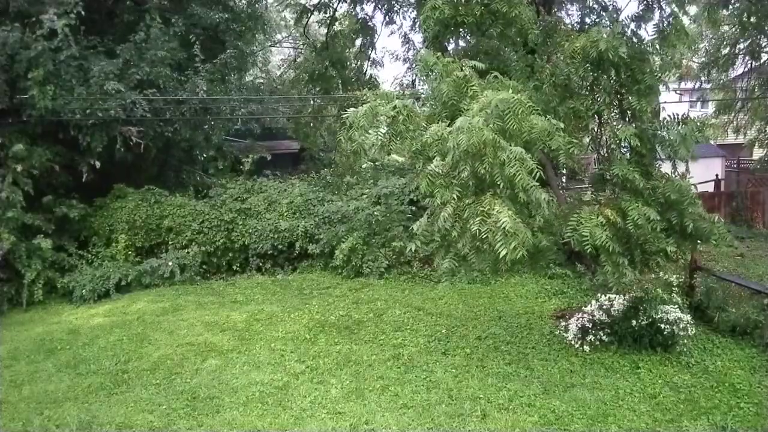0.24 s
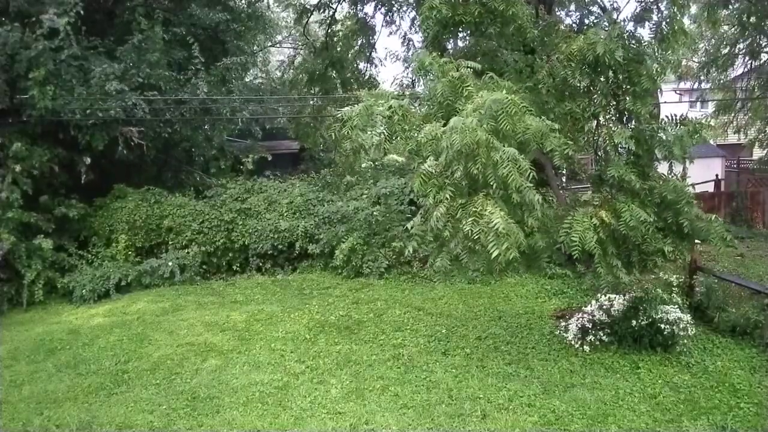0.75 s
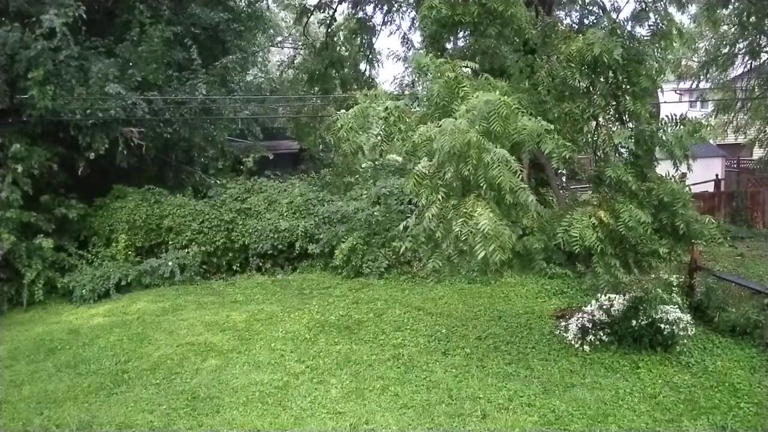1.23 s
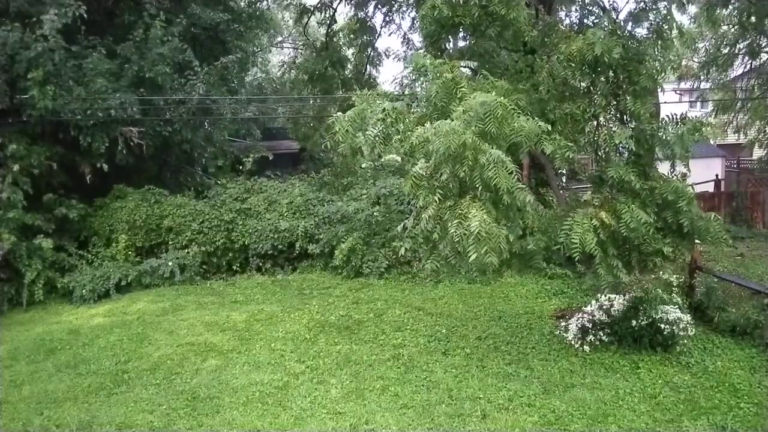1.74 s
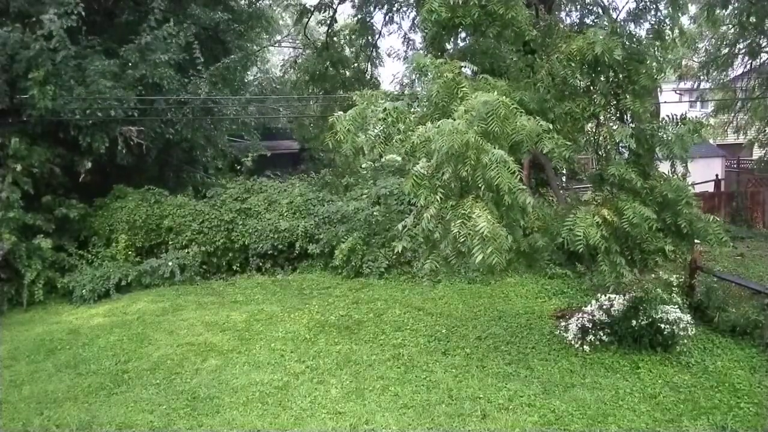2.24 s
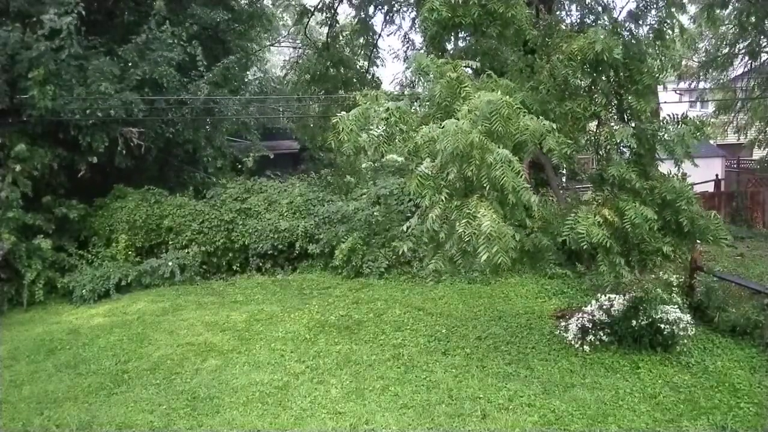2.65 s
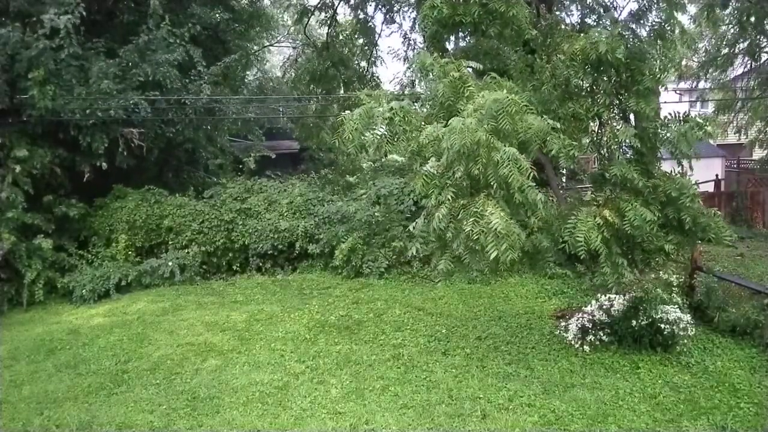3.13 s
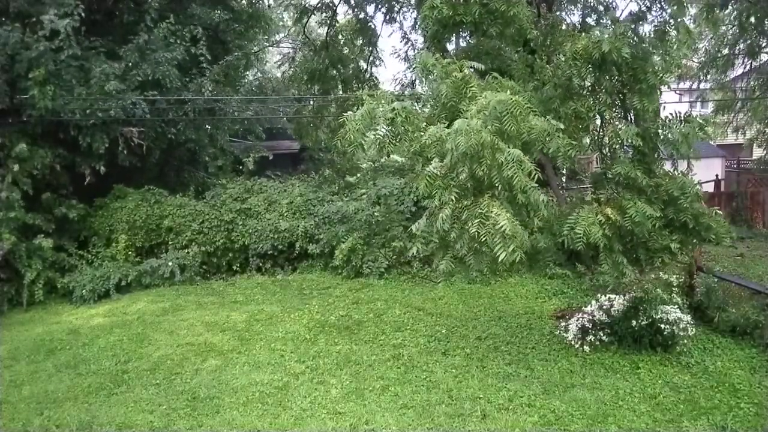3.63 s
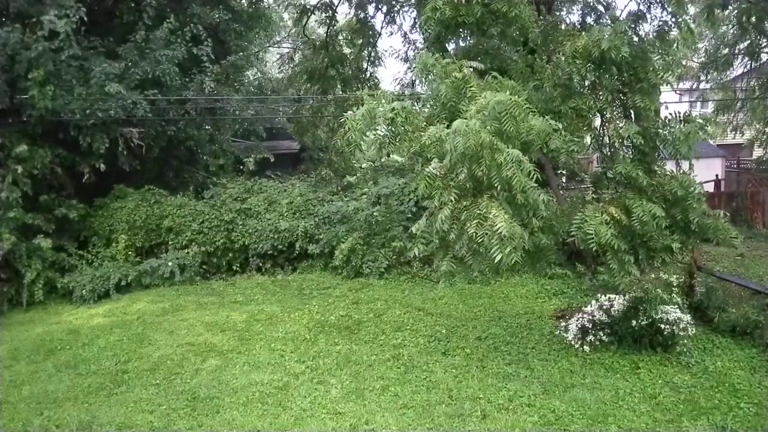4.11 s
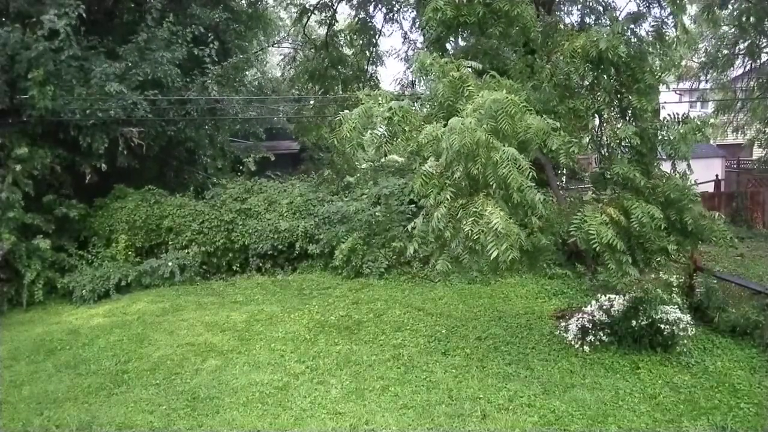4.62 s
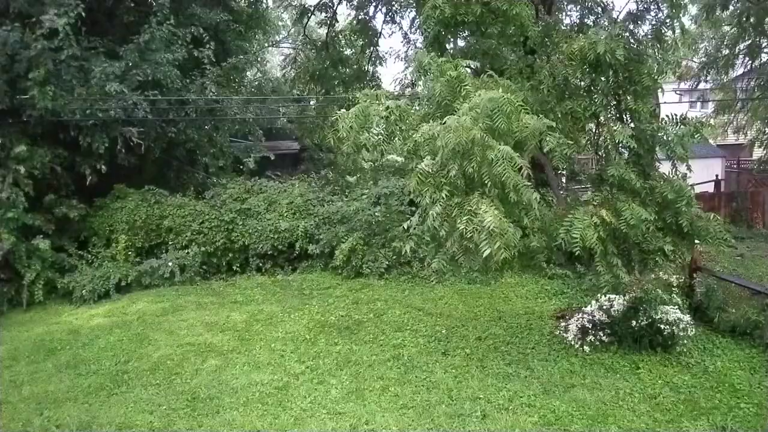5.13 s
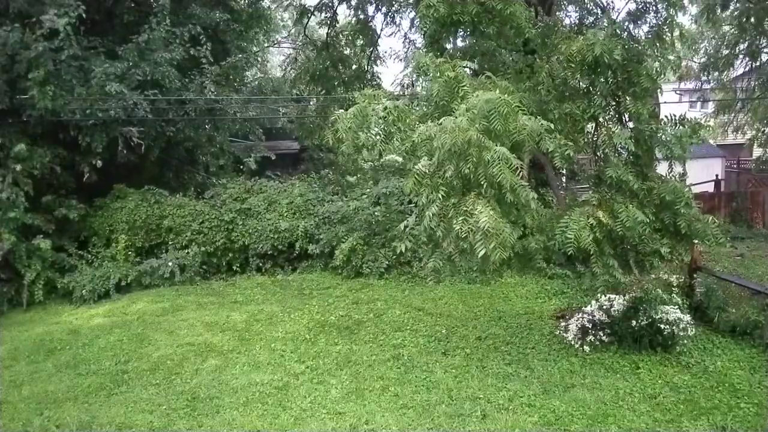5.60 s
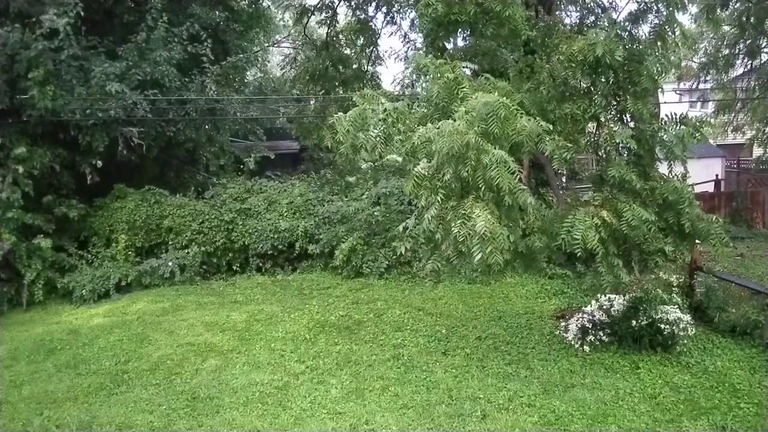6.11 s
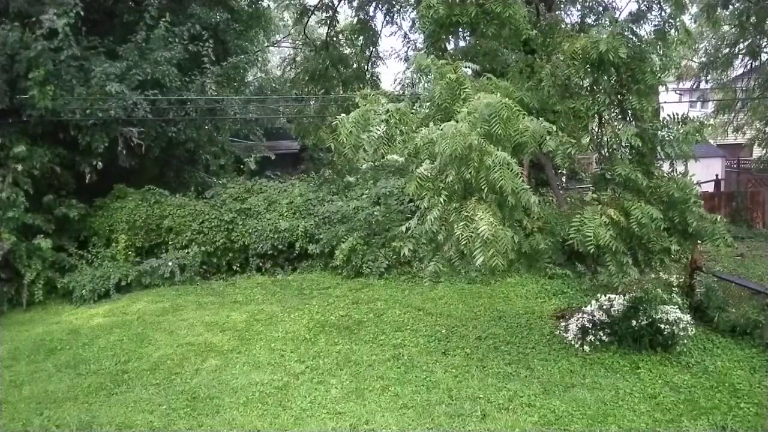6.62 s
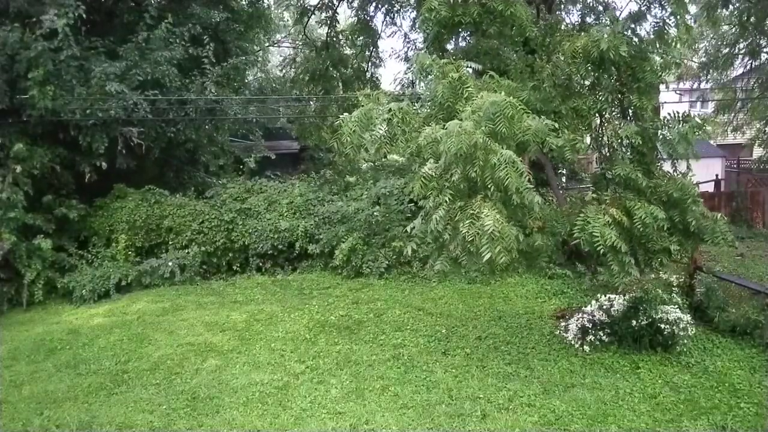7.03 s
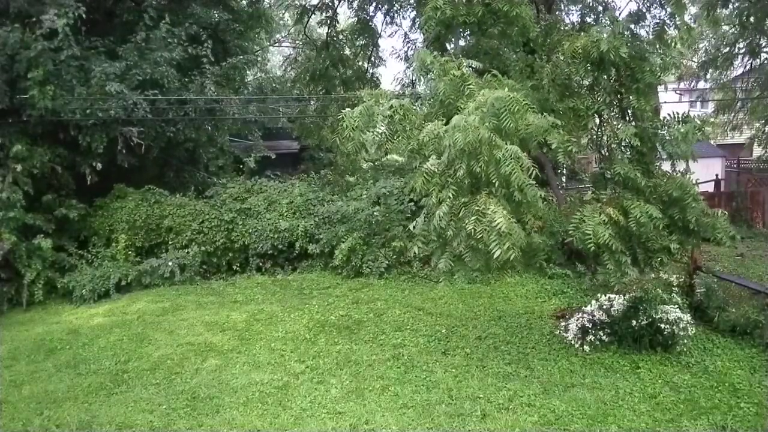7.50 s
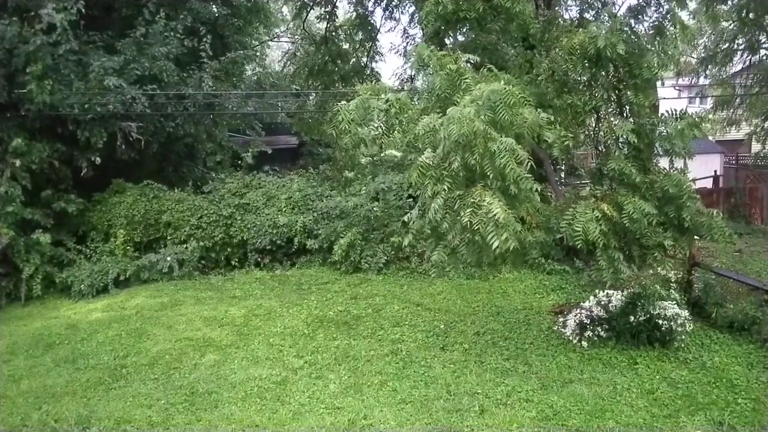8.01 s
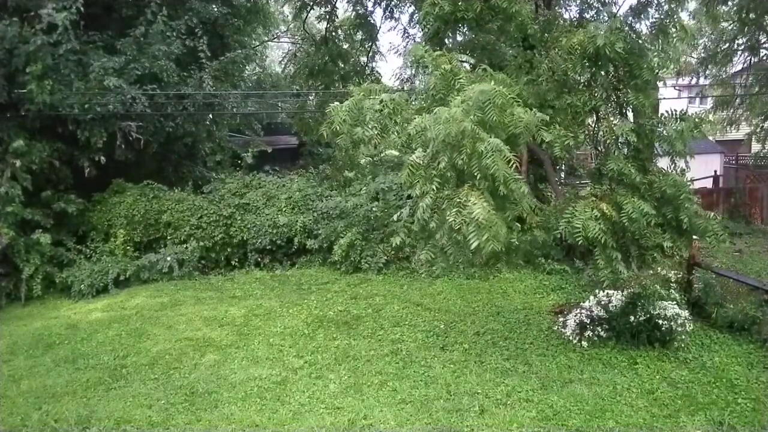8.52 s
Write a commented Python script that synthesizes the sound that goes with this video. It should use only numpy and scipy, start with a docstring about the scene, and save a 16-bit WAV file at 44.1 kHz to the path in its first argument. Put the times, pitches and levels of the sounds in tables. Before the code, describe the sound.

Steady rain on a garden, hollow taps and fine ticking on a nearby cover, low wind buffets growing into a long gust near the end.

```python
"""A back garden in heavy rain, with the microphone under a shelter.
Close by, drops knock on a hollow cover: ringing modes, with small ticks that swell in flurries.
A few near drops splash brightly, as short bursts of filtered noise.
Farther off, countless drops on leaves and lawn merge into a hiss of shaped noise and random clicks.
A breeze rumbles on the microphone in short buffets and rises to a long gust near the end."""
import sys
import numpy as np
from scipy import signal
from scipy.fft import rfft, irfft, next_fast_len
from scipy.io import wavfile
from scipy.ndimage import uniform_filter1d

SR = 44100
rng = np.random.default_rng(int(sys.argv[2]) if len(sys.argv) > 2 else 0)


def generate_wav(sig):
    """Save sig (samples, or channels by samples) to the path in sys.argv[1] as 16-bit PCM at SR."""
    pcm = np.round(np.clip(np.atleast_2d(sig).T, -1, 1) * 32767).astype(np.int16)
    wavfile.write(sys.argv[1], SR, pcm)


N = 385875

# big drops on the cover: t/s, relative peak level/dB, middle ring level/dB, upper ring level/dB
BIG_DROPS = [(0.015, -17, -23, -21), (0.035, -15.5, -12, -17), (0.085, -23, 2, -2), (0.209, -21, 1, -24),
             (0.275, -17, -22, -9.5), (0.468, -19.5, -19, -17), (0.51, -25, -1, -23), (0.535, -22, -7, -27),
             (0.737, -16, -16, -25), (1.204, -18.5, -8, -30), (1.324, -21, -18, -13),
             (1.333, -18.5, -19, -9), (1.41, -21, -14, -13), (1.474, -22, -10, -12), (1.485, -16, -18, -23),
             (1.516, -22, -15, -13), (1.542, -21, -10, -16), (1.572, -13, -19, -32),
             (1.635, -13.5, -10, -24), (1.796, -17.5, -23, -17), (1.893, -23.5, -9, -12),
             (1.981, -26, -14, 0), (2.003, -15.5, 1, -2.5), (2.019, -24, -10, -9), (2.035, -21, -10, -16),
             (2.113, -21.5, -13, -17), (2.333, -21, -12, -15), (2.596, -25, -12, -7),
             (2.841, -17, -23, -32), (2.897, -15.5, -12, -18), (2.959, -22.5, -12, -13),
             (3.091, -21, -11, -28), (3.149, -13, -23, -23), (3.232, -23, -10, -11),
             (3.433, -19.5, -10, -30), (3.48, -16.5, -26, -32), (3.518, -16, -13, -21),
             (3.559, -22.5, -12, -16), (3.829, -21, -22, -26), (3.856, -14.5, -16, -27),
             (3.903, -22, -11, -15), (3.952, -19, -5, -14), (4.037, -24, -13, -15), (4.112, -22, -12, -21),
             (4.137, -20, -10, -18), (4.28, -23, 3, -6), (4.312, -22.5, -1, -3), (4.338, -24, -15, -21),
             (4.386, -25, -13, -12), (4.467, -23, -6, -14), (4.494, -20.5, -15, -8.5),
             (4.715, -21, -13, -21), (4.749, -23, -6, -8), (4.764, -18.5, -10, -5), (4.801, -23, -15, -12),
             (4.818, -14, -14, -15), (4.903, -22, -15, -3), (4.937, -19, -18, -22), (4.961, -26, -8, -14),
             (4.991, -16, -12, -19), (5.019, -24, -19, -19), (5.074, -20, -5, -12), (5.161, -27, -14, -9),
             (5.276, -28, -11, -5), (5.298, -25.5, -12, -7), (5.356, -20.5, -4, -13), (5.471, -28, -6, -9),
             (6.11, -19.5, -20, -16), (6.158, -16, -12, -15), (6.206, -15, -10, -17),
             (6.317, -22.5, -18, -11), (6.333, -19.5, -16, -14), (6.414, -21, 3, -14),
             (6.459, -18.5, -9, -11), (6.473, -14, -10, -22), (6.573, -13.5, -10, -14),
             (6.591, -11.5, -9, -15), (6.605, -20, -15, -17), (6.772, -19, -4, -11),
             (6.828, -12.5, -13, -23), (6.881, -15, -21, -19), (6.965, -13.5, -25, -20),
             (7.017, -16, -18, -29), (7.046, -19, -5, -10), (7.085, -15, -2, -4), (7.116, -21, -11, -13),
             (7.183, -19, -13, -11), (7.289, -15, -9, -17), (7.367, -14, -13, -13), (7.386, -17, -8, -14),
             (7.396, -14.5, -9, -15), (7.41, -12.5, -10, -21), (7.455, -18.5, -10, -14),
             (7.494, -11.5, -20, -25), (7.546, -18, -13, -16), (7.577, -16, -7, -13),
             (7.587, -17, -15, -13), (7.621, -28, -15, 2), (7.74, -11.5, -21, -18),
             (7.845, -19.5, -14, -16), (8.041, -19, -7, -10), (8.059, -14, -10, -14), (8.124, -20, -5, -6),
             (8.295, -15.5, -11, -15), (8.343, -20, -8, -7), (8.385, -17.5, -12, -15),
             (8.418, -18.5, -5, -9), (8.447, -17.5, -11, -31), (8.589, -12, -13, -34), (8.646, -23, 4, -19),
             (8.719, -15, -18, -15)]
# modes of the cover: f/Hz, relative level/dB, t60/s, share of the middle ring, share of the upper ring,
# lag of the right side behind the left/rad
COVER_MODES = [(730, -3, 0.016, 0, 0, 0), (920, 5, 0.034, 0.1, 0.079, 0.37),
               (1062, -4.5, 0.033, 0.96, 0.0072, 0.49), (1357.5, -3.5, 0.054, 0, 1, 0.54),
               (1480, -67, 0.012, 0.49, 0.51, -13.5), (2260, -17, 0.025, 0.083, 1, 1.4),
               (2785, -17, 0.0079, 0.089, 0.3, 2.4), (4870, -20.5, 0.019, 0, 0.011, 1)]
# flurries of small drops on the cover: t/s, relative level/dB
FLURRIES = [(0, -32), (0.4, -39.5), (1.0, -39.5), (1.55, -33), (2.4, -43), (3.1, -38.5), (3.9, -37.5),
            (4.6, -42.5), (4.85, -30.5), (5.5, -40), (5.85, -44.5), (6.3, -41), (7.0, -31.5), (7.6, -34.5),
            (8.3, -38), (8.75, -42)]
# bright splashes close by: t/s, relative peak level/dB, spray level relative to that peak/dB
NEAR_SPLASHES = [(0.2974, -37, -12), (0.412, -25, -15), (0.4723, -35, -5), (0.9134, -41, -9),
                 (1.3354, -29, -17), (2.004, -23, -21), (3.954, -28, -8), (4.4139, -39, -6),
                 (4.8613, -24, -15), (4.8638, -30, -9), (5.3592, -29, -21), (5.881, -34, -6),
                 (6.1644, -26, -17), (6.794, -36, -10), (6.956, -21, -25), (7.0003, -18.5, -24),
                 (7.0184, -25, -12), (7.118, -27, -22), (7.1996, -36, -3), (7.7414, -28, -13)]
# spectrum of the high rush on the leaves: f/Hz, level per Hz/dB
HISS_SPECTRUM = [(2800, -18.5), (3550, -7.5), (3850, 1), (4450, 0.5), (4710, 2.5), (5000, 0.5), (5700, 0.5),
                 (6200, -3.5), (7200, -6.5), (9200, -8), (11300, -5.5), (13150, -1.5), (13700, -4.5),
                 (15700, -6)]
# spectrum of the lower rush on the leaves: f/Hz, level per Hz/dB
WASH_SPECTRUM = [(400, -41), (800, 12), (900, 9), (1230, 10), (1400, 8), (1520, 7.5), (1850, 3.5),
                 (2200, 4), (2550, 1), (2850, -1.5), (3250, 0), (3600, -5.5), (4200, -59)]
# a thin hiss near 2.8 kHz that comes and goes: t/s, level/dB
THIN_HISS_LEVEL = [(0.0, -54), (0.8, -63), (1.5, -51), (2.4, -57), (3.3, -52.5), (5.2, -61), (5.9, -63),
                   (6.9, -62), (8.75, -64)]
# strength of the wind, with one long gust near the end: t/s, level above the usual breeze/dB
WIND_FORCE = [(0, -1.8), (0.6, 1.6), (1.0, -1.5), (1.4, -0.2), (2.0, 3), (2.2, -0.5), (3.3, -0.1),
              (4.3, 2.2), (4.45, -0.8), (4.95, -3.5), (5.75, 0.6), (6.5, 0.8), (7.02, 12.5), (7.15, 9.5),
              (7.7, 10), (7.95, 8.5), (8.55, 9.5), (8.75, 10.5)]
# tone of the wind noise: t/s, amount by which the flutter rises and the deep rumble falls/dB
WIND_TONE = [(0.0, 1), (1.1, -1), (2.8, 4.5), (3.5, 0.5), (4.8, -1), (6.0, 0.5), (6.8, -0.5), (7.7, 1),
             (8.75, 0)]
# buffets of air on the microphone, levels before the envelope and the lumps of the turbulence:
# t/s, length/s, deep rumble level/dB, flutter level/dB, churning level/dB
MIC_BUFFETS = [(0.079, 0.16, -35, -12, -22), (0.746, 0.1, -18, -12.5, -18.5), (0.854, 0.058, -18, -22, -32),
               (1.74, 0.39, -21.5, -15, -24), (2.342, 0.34, -32, -15, -24), (2.983, 0.42, -32, -24, -43),
               (3.687, 0.16, -12.5, -16.5, -20), (3.886, 0.035, -3, -6, -17),
               (3.948, 0.085, -7, -15, -24.5), (4.241, 0.12, -11.5, -17, -20),
               (4.524, 0.18, -16.5, -18.5, -24.5), (4.8, 0.04, -12, -16, -20.5),
               (5.2, 0.3, -18.5, -28, -30), (5.655, 0.26, -16, -37, -26), (7.128, 0.1, -19, -9.5, -17),
               (7.366, 0.26, -20, -10, -31), (7.686, 0.09, -22, -7, -13), (8.15, 0.036, 0, -17, -16),
               (8.312, 0.075, -12.5, -35, -30), (8.455, 0.16, -17, -21, -12),
               (8.603, 0.014, -15, -12, -6.5)]
# spectrum of the deep wind rumble: f/Hz, level per Hz/dB
RUMBLE_SPECTRUM = [(15, -26), (28, -32), (42, 2), (60, 6), (85, 8.5), (115, 2), (180, -60), (400, -33)]
# spectrum of the wind flutter: f/Hz, level per Hz/dB
FLUTTER_SPECTRUM = [(50, -26), (85, -42.5), (112, 4.5), (148, 3.5), (185, 0.5), (230, -9.5), (400, -34)]
# spectrum of the churning wind: f/Hz, level per Hz/dB
CHURN_SPECTRUM = [(120, -5), (190, -6.5), (225, -1), (250, 1.5), (272, -6), (298, -0.5), (335, -6),
                  (385, -16.5), (600, -36), (1500, -65)]
# spectrum of the fine eddies: f/Hz, level per Hz/dB
EDDY_SPECTRUM = [(200, -3), (370, -10), (425, 3), (520, -2.5), (690, -2.5), (780, -8.5), (900, -6),
                 (1200, -17.5), (1400, -27.5), (1800, -31), (4000, -68)]
# stereo width of rush and wind: f/Hz, level of the side difference relative to the sum/dB
STEREO_WIDTH = [(25, -41), (60, -39), (130, -27.5), (260, -20), (450, -9), (560, -4), (700, -8.5),
                (1400, -5), (1550, -2), (1800, 10), (2170, -3.5), (2550, 2.5), (2850, -7), (3220, 9),
                (3600, -5), (3900, 1), (15000, 0.4)]

DROP_DETUNE, DROP_SCATTER_DB = 0.03, 1.2   # spread of mode pitch (share) and mode level from drop to drop
SLAP_S, SLAP_DB = 0.0045, -10   # typical delay and relative level of the second slap
# the rush on the leaves swells with the flurries: dB per dB
HISS_FOLLOWS, WASH_FOLLOWS = 0.05, 0.3
# the turbulence grows with the wind: dB per dB
RUMBLE_GROWTH, FLUTTER_GROWTH, CHURN_GROWTH, EDDY_GROWTH = 0.33, 0.61, 0.98, 1.04
BUFFET_ATTACK_S, BUFFET_RELEASE_SHARE = 0.029, 1   # rise time; share of the length over which it dies
CUTOFF_HZ = 15720


def taps(gain_db=5.0, usual_middle_db=-14.5, usual_upper_db=-12.5, rise_cycles=0.89):
    """Big drops close by set the modes of the cover ringing, each with its own balance of rings."""
    times, peak_db, middle_db, upper_db = np.transpose(BIG_DROPS)
    return cover(times, peak_db + gain_db, middle_db - usual_middle_db, upper_db - usual_upper_db, rise_cycles)


def cracks(gain_db=-13, t60=0.011, low_hz=1900, high_hz=3600, bright_share=0.71):
    """A big drop meets the cover with a short noise crack, stronger where the upper modes ring."""
    times, peak_db, _, upper_db = np.transpose(BIG_DROPS)
    hits = clicks(times, from_db(peak_db + gain_db + bright_share * upper_db))
    return fade(hits, t60) * noise_band(low_hz, high_hz)


def rebounds(gain_db=-18, count=2, rise_cycles=0.46):
    """Each big drop throws up droplets that land on the cover a moment later."""
    times, peak_db = np.repeat(np.array(BIG_DROPS)[:, :2], count, axis=0).T
    delay, strength, middle, upper = rng.random((len(times), 4)).T
    landings = times + 0.013 + 0.022 * delay
    return cover(landings, peak_db + gain_db - 8 * strength, 8 * middle - 2, 8 * upper, rise_cycles)


def drips(flurry_db, level_db=-25.0, follows=0.54, spread_db=2.0, count=75, rise_cycles=0.42):
    """Medium drops land on the cover at uneven intervals, a little harder in the flurries."""
    jitter, strength, middle, upper = rng.uniform(-1, 1, (count, 4)).T
    times = (np.arange(count) + 0.5 + 0.5 * jitter) * N / SR / count
    drops = cover(times, spread_db * strength, 8 * middle, 1.5 + 8 * upper, rise_cycles)
    return from_db(level_db + follows * flurry_db) * drops


def patter(level_db, gain_db=-7.0, spread_db=7, count=600, rise_cycles=0.26):
    """Small drops keep the cover ticking between the big ones, louder in the flurries."""
    strength, middle, upper = rng.uniform(-1, 1, (3, count))
    times = rng.uniform(0, N / SR, count)
    drops = cover(times, spread_db * strength, 7 * middle, 1.6 + 7 * upper, rise_cycles)
    return from_db(level_db + gain_db) * rms_one(drops)


def cover(times, level_db, middle_db, upper_db, rise_cycles, size=1300):
    """Where a drop lands sets the mix and pitch of the modes; its water slaps down again, more weakly."""
    hz, mode_db, t60, middle, upper, lag = np.transpose(COVER_MODES)
    chance = rng.standard_normal((len(times), 3, len(COVER_MODES)))
    ring_db = np.outer(middle_db, middle) + np.outer(upper_db, upper)
    mix = from_db(mode_db + ring_db + DROP_SCATTER_DB * chance[:, 0])
    sizes = from_db(level_db)[:, None] * mix / np.linalg.norm(mix, axis=1, keepdims=True)
    pitches = hz * (1 + DROP_DETUNE * chance[:, 1])
    age = np.arange(size) / SR
    knocks = 0   # becomes side x drop x sample
    for k in range(len(COVER_MODES)):
        # a drop is soft: each mode builds up over a part of its cycle
        build_up = 1 - np.exp(-(age * hz[k] / rise_cycles) ** 2)
        shape = build_up * from_db(-60 * age / t60[k])
        side_phase = lag[k] * np.array([0.5, -0.5])[:, None, None]
        phase = 2 * np.pi * np.outer(pitches[:, k], age) + side_phase
        knocks = knocks + np.outer(sizes[:, k], shape) * np.sin(phase.astype(np.float32))

    def placed(starts):
        """Add every knock into the stereo track at its start."""
        first = np.maximum(starts * SR, 0).astype(int)
        at = (first[:, None] + np.arange(size)).ravel()
        return np.array([np.bincount(at, side.ravel(), N)[:N] for side in knocks])

    slap_times = times + SLAP_S * (1 + 0.098 * chance[:, 2, 0])
    return placed(times) + from_db(SLAP_DB) * placed(slap_times)


def splashes(body_db=-4, spray_db=7, burst_t60=0.0056, spray_t60=0.005, settle_db=-13, settle_t60=0.13,
             droplet_db=-9, flight_s=0.053, count=2):
    """A near drop bursts: a short fizz under a bright spray, then droplets fall back and mist settles."""
    times, peak_db, top_db = np.transpose(NEAR_SPLASHES)
    landings = (times[:, None] + flight_s * rng.random((len(times), count))).ravel()

    def fizz(level_db, t60, low_hz, high_hz):
        """Bursts, falling droplets and settling mist in one band of noise."""
        bursts = clicks(times, from_db(level_db))
        droplets = clicks(landings, np.repeat(from_db(level_db + droplet_db), count))
        swell = fade(bursts + droplets, t60) + from_db(settle_db) * fade(bursts, settle_t60)
        return swell * noise_band(low_hz, high_hz)

    body = fizz(peak_db + body_db, burst_t60, 4500, 5940)
    spray = fizz(peak_db + top_db + spray_db, spray_t60, 8100, 16000)
    return body + spray


def leaves(flurry_db, hiss_db=-42.0, wash_db=-44, grain_db=-6, broad_leaves_db=-55, fine_spray_db=-57,
           surge_db=0.5, wash_surge_db=2.4, tick_db=-60):
    """Far drops merge into a steady rush with a fine crackle; nearer ones spatter and tick."""
    def drops():
        """Smooth noise for the uncountable drops, with a grain of single ones."""
        grain = np.array([shower(2500, 3.0), shower(2300, 3.5)])
        return rng.standard_normal((2, N)) + from_db(grain_db) * grain

    hiss_level_db = hiss_db + HISS_FOLLOWS * flurry_db + surge_db * drift(15)
    hiss = from_db(hiss_level_db) * coloured(drops(), HISS_SPECTRUM)
    wash_level_db = wash_db + WASH_FOLLOWS * flurry_db + wash_surge_db * drift(6)
    wash = from_db(wash_level_db) * coloured(drops(), WASH_SPECTRUM)
    near = from_db(broad_leaves_db) * (spatter(60, 3340, 5500, 0.084) + spatter(60, 3400, 6100, 0.045))
    fine = from_db(fine_spray_db) * spatter(35, 11800, 14400, 0.04)
    ticks = from_db(tick_db) * spatter(20, 7000, 15000, 0.011)
    return hiss + wash + near + fine + ticks


def spatter(per_s, low_hz, high_hz, t60):
    """Drops that burst on leaves, each a tiny puff of noise in one range of pitch; rms 1."""
    puffs = fade(abs(shower(per_s, 2.9)), t60)
    return rms_one(puffs * band(rng.standard_normal((2, N)), low_hz, high_hz))


def shower(per_s, spread_db, largest=4.0):
    """Clicks of either sign for drops at random moments, many small and few large; rms 1."""
    size_db = spread_db * np.minimum(rng.exponential(1, N), largest)
    sizes = from_db(size_db) * rng.choice([-1, 1], N)
    return rms_one(sizes * (rng.random(N) < per_s / SR))


def thin_hiss(low_hz=2600, high_hz=3080):
    """A narrow band of the rush, made of noise, swells and fades."""
    return from_db(in_time(THIN_HISS_LEVEL)) * noise_band(low_hz, high_hz)


def wind(rumble_db=-25, flutter_db=-24.5, churn_db=-26.5, eddy_db=-36, lumpy_db=1.57, rumble_lumpy_db=2.0,
         flutter_lumpy_db=2.5, churn_lumpy_db=1.74):
    """Turbulence on the microphone comes in lumps; the stronger the wind, the more fine eddies join."""
    force_db = in_time(WIND_FORCE)
    tilt_db = in_time(WIND_TONE)
    lumps_db = lumpy_db * drift(19.0)   # shared by all four layers

    def layer(spectrum, breeze_db, buffet, own_db):
        """Breeze and buffets add in power, then swell in lumps."""
        strength = np.hypot(from_db(breeze_db), buffet)
        return strength * from_db(lumps_db + own_db * drift(10.6)) * turbulence(spectrum)

    deep, middle, high = buffets()
    rumble_breeze_db = rumble_db + RUMBLE_GROWTH * force_db - tilt_db
    rumble = layer(RUMBLE_SPECTRUM, rumble_breeze_db, deep, rumble_lumpy_db)
    flutter_breeze_db = flutter_db + FLUTTER_GROWTH * force_db + tilt_db
    flutter = layer(FLUTTER_SPECTRUM, flutter_breeze_db, middle, flutter_lumpy_db)
    churn = layer(CHURN_SPECTRUM, churn_db + CHURN_GROWTH * force_db, high, churn_lumpy_db)
    eddies = from_db(eddy_db + EDDY_GROWTH * force_db + lumps_db) * turbulence(EDDY_SPECTRUM)
    return rumble + flutter + churn + eddies


def buffets():
    """Strength of rumble, flutter and churning as each buffet rises, then dies away; powers add."""
    t = np.arange(N) / SR
    power = np.zeros((3, N))
    for start, length, *level_db in MIC_BUFFETS:
        rise = (t - start) / BUFFET_ATTACK_S
        fall = (start + length - t) / (BUFFET_RELEASE_SHARE * length)
        shape = np.clip(np.minimum(rise, fall), 0, 1)
        power += np.outer(from_db(level_db) ** 2, shape)
    return np.sqrt(power)


def turbulence(spectrum, size=4400):
    """Churning air evened out over a tenth of a second: its swells are left to the gusts."""
    air = coloured(rng.standard_normal((2, N)), spectrum)
    return air / np.sqrt(uniform_filter1d(np.mean(air ** 2, axis=0), size) + 1e-9)


def coloured(pair, spectrum):
    """Two unrelated signals become one stereo sound with this spectrum, steep above its end; rms 1."""
    size = next_fast_len(N)
    hz = np.arange(size // 2 + 1) * SR / size
    roll_off = np.maximum(hz / spectrum[-1][0], 1) ** 4   # 24 dB per octave above the last point
    mid, side = rfft(pair, size) * from_db(at_hz(spectrum, hz)) / roll_off
    width = from_db(at_hz(STEREO_WIDTH, hz))
    left_right = (mid + width * side * [[1], [-1]]) / np.hypot(1, width)
    return rms_one(irfft(left_right, size)[:, :N])


def drift(rate_hz, step=40):
    """Slow random wander with spread 1: low-passed noise, made at every 40th sample and joined up."""
    r = np.exp(-2 * np.pi * rate_hz * step / SR)
    settle = 2000   # steps thrown away while the filter starts up
    chance = rng.standard_normal(N // step + 2 + settle)
    slow = signal.lfilter([1], [1, -2 * r, r * r], chance)[settle:]
    return np.interp(np.arange(N) / step, np.arange(len(slow)), rms_one(slow))


def clicks(times, sizes):
    """One click of the given size at each time."""
    return np.bincount(np.clip(times * SR, 0, N - 1).astype(int), sizes, N)


def fade(x, t60):
    """Each click jumps up and dies away by 60 dB in t60 seconds."""
    return signal.lfilter([1], [1, -from_db(-60 / (t60 * SR))], x + 1e-18)


def band(x, low_hz, high_hz):
    """Band-pass."""
    return signal.sosfilt(signal.butter(2, [low_hz, high_hz], "band", fs=SR, output="sos"), x)


def noise_band(low_hz, high_hz):
    """Stereo noise in one range of pitch; rms 1."""
    return rms_one(band(rng.standard_normal((2, N)), low_hz, high_hz))


def from_db(db):
    """Decibels to gain."""
    return 10 ** (np.asarray(db) / 20)


def rms_one(x):
    """Scale to rms 1."""
    return x / np.sqrt(np.mean(x ** 2) + 1e-20)


def in_time(rows):
    """A curve of time and value, read at every sample."""
    s, value = np.transpose(rows)
    return np.interp(np.arange(N) / SR, s, value)


def at_hz(points, hz):
    """Read a table along a log-frequency axis."""
    points = np.array(points)
    return np.interp(np.log(hz + 1), np.log(points[:, 0]), points[:, 1])


def scene():
    """Rain near and far, with wind whose strongest swings are rounded off."""
    patter_db = in_time(FLURRIES)
    flurry_db = patter_db - patter_db.mean()
    drops = taps() + rebounds() + drips(flurry_db) + patter(patter_db)
    knocks = band(drops, 350, 11000)   # a small panel radiates little bass
    air = band(np.tanh(wind()), 29.5, 5000)
    return knocks + cracks() + splashes() + leaves(flurry_db) + thin_hiss() + air


def record(dry):
    """A steep low-pass cuts off the top."""
    return signal.sosfilt(signal.ellip(16, 0.1, 90, CUTOFF_HZ, fs=SR, output="sos"), dry)


dry = scene()
out = record(dry)
generate_wav(out)
```